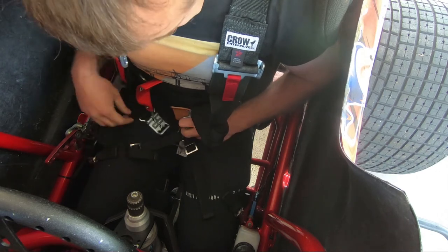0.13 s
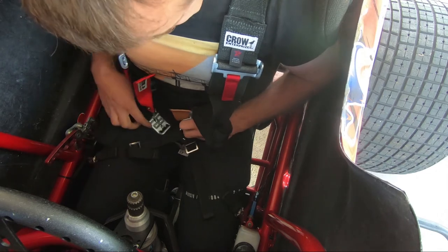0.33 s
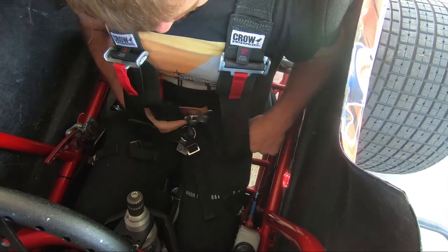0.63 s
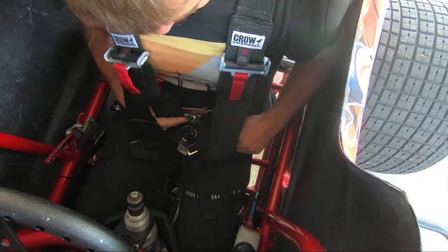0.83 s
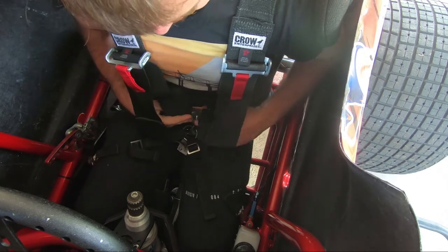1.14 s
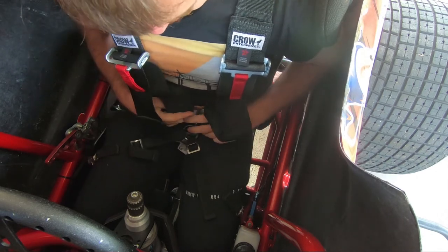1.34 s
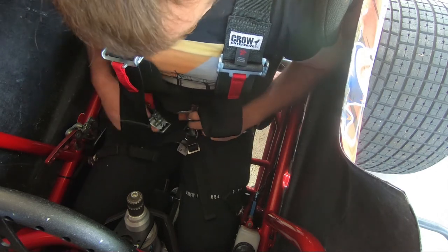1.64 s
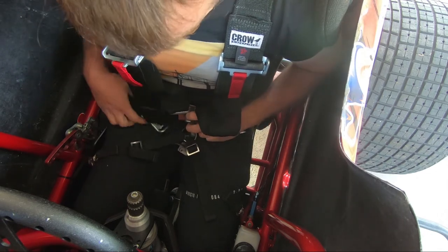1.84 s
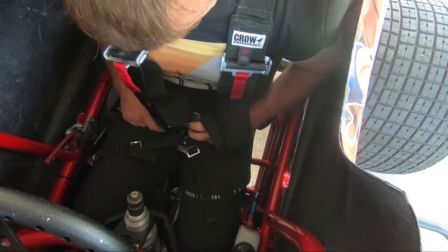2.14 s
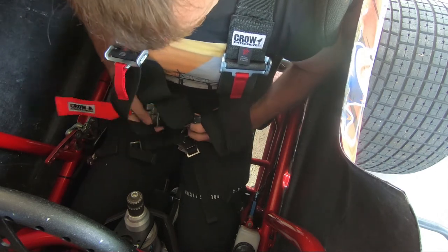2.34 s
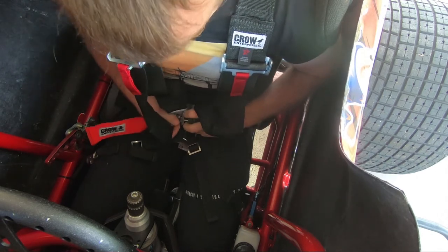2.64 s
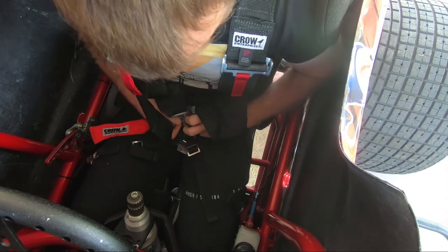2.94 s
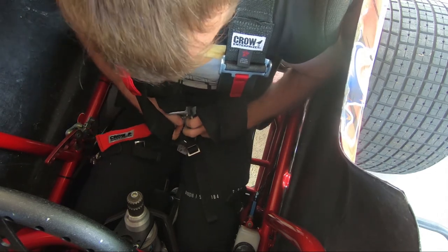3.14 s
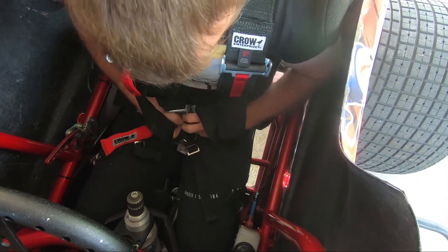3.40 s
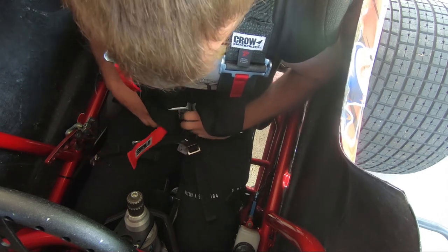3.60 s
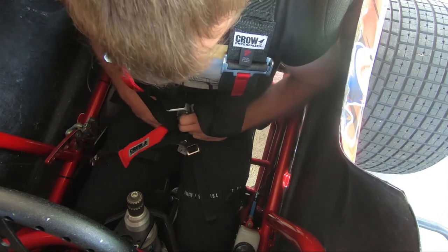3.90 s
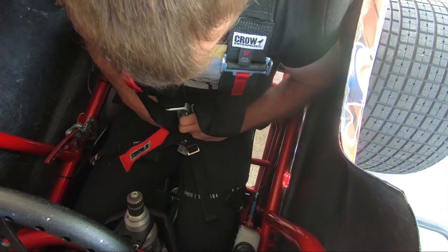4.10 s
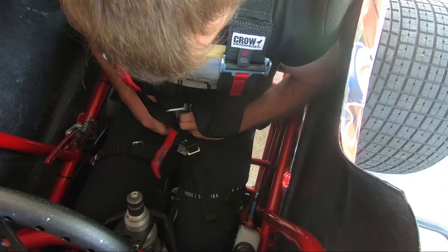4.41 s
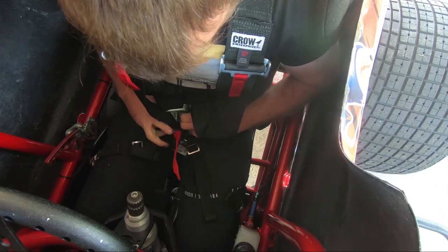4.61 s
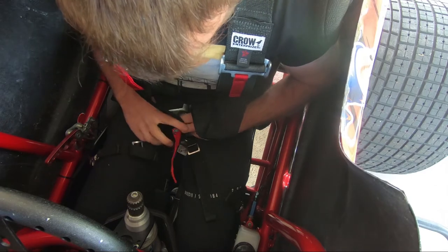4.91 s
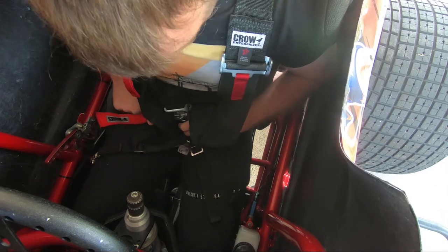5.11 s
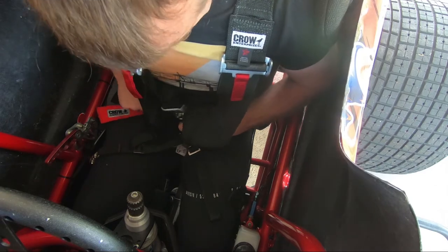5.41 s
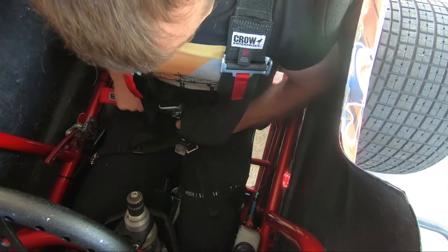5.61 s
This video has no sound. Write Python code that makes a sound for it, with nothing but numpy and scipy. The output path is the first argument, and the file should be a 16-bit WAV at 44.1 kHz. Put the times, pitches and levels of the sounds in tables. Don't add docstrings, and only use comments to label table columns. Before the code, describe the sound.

Close-miked seat belt fastening: a lever pings lightly, steel plates clink, a hook catches, and webbing rubs and drags between sparse small clicks. Muffled buckle bumps land on the padded seat. After a quieter fumbling stretch, one sharp metallic snap closes the latch with a brief hollow cockpit response. Nearly mono and dry, with soft air drift.

```python
import sys
import numpy as np
from scipy import signal
from scipy.fft import irfft
from scipy.io import wavfile

SR = 44100
rng = np.random.default_rng(int(sys.argv[2]) if len(sys.argv) > 2 else 0)


def natural_amplitude(level_db):
    exponent = np.asarray(level_db, float) / 20
    return 10 ** exponent


def to_wav(s):
    ch = np.atleast_2d(s).T
    pcm = np.round(np.clip(ch, -1, 1) * 32767)
    wavfile.write(sys.argv[1], SR, pcm.astype(np.int16))


N = 253575
SNAP_S = 5.5215


def rms_one(x):
    return x / np.sqrt(np.mean(x ** 2) + 1e-20)


def in_time(rows):
    s, *columns = np.transpose(rows)
    return [np.interp(np.arange(N) / SR, s, column) for column in columns]


def at_hz(points, hz):
    points = np.array(points)
    return np.interp(np.log(hz), np.log(points[:, 0]), points[:, 1])


def band(x, low_hz, high_hz, order=2):
    edges = [low_hz, min(high_hz, .45 * SR)]
    return signal.sosfilt(signal.butter(order, edges, "band", fs=SR, output="sos"), x)


def steep_low_pass(x, hz):
    return signal.sosfilt(signal.cheby2(16, 70, hz, fs=SR, output="sos"), x)


def drift(rate_hz):
    r = np.exp(-40 * np.pi * rate_hz / SR)
    white = rng.standard_normal(N // 20 + 4002)
    slow = signal.lfilter([1], [1, -2 * r, r * r], white)[4000:]
    return np.interp(np.arange(N) / 20, np.arange(len(slow)), rms_one(slow))


def ring(clicks, hz, t60):
    r, w = natural_amplitude(-60 / (max(t60, .004) * SR)), 2 * np.pi * hz / SR
    return signal.lfilter([0, np.sin(w)], [1, -2 * r * np.cos(w), r * r], clicks + 1e-18)


def add(out, s, x):
    i = max(round(s * SR), 0)
    out[i:i + len(x)] += x[:N - i]


def uneven(size, rough_db, most):
    white = rng.standard_normal(size)
    return rms_one(white * natural_amplitude(rough_db * np.minimum(rng.exponential(1, size), most)))


def chatter(t60, rough_db, rise=0.00013, size=5000):
    t = np.arange(size) / SR
    sizes = uneven(size, rough_db, most=4)
    return sizes * natural_amplitude(-60 * t / np.clip(t60, .004, .4)) * np.minimum(t / rise, 1)


def latch():
    # slide before the slam/s, level/dB, t60/s
    snap_settings = (0.00678, -28, 0.034)
    # f/Hz, level per Hz/dB
    snap_colour = [(120, -48), (200, -33), (409, 4), (569, -9), (763, -2), (899, -6), (1230, 4), (1480, -8),
                   (2170, -11), (2700, -0.5), (3970, 1), (8420, 0.5), (16000, -8.5)]
    # f/Hz, level/dB, t60/s
    body_modes = [(453, -27, 0.06), (808, -18, 0.046), (1230, -23, 0.041), (2320, -32, 0.1),
                  (2810, -27, .03), (4340, -18, 0.022), (6120, -16, .025), (6950, -13, .024),
                  (7960, -17, .025), (8140, -6, 0.022), (8560, -5, 0.022), (9090, -26, 0.026),
                  (13090, -20, .025)]
    # t/s, level/dB
    bounces = [
        (0, 0.5),
        (.001, -5),
        (.002, -1),
        (.004, 2),
        (.0065, -6.5),
        (0.0108, -15.5),
    ]
    slide, peak_db, t60 = snap_settings
    t = np.arange(6000) / SR - slide
    spray = uneven(6000, rough_db=2.0, most=3)
    edges, crack = np.geomspace(200, 16500, 14), 0
    for k, (lo, hi) in enumerate(zip(edges, edges[1:])):
        hz = np.sqrt(lo * hi)
        band_t60 = t60 * (3000 / hz) ** 0.088
        rattle_db = -60 * (t / band_t60) ** 0.75 * (t > 0)
        shape = natural_amplitude(np.where(t < 0, 5000 * t - 3, np.nan_to_num(rattle_db)))
        crack = crack + band(spray * shape, lo, hi) * natural_amplitude(at_hz(snap_colour, hz)) * (-1) ** k
    slam = sum(natural_amplitude(db - 5) * np.exp(-((t - s) / .00003) ** 2) for s, db in bounces)
    body = sum(natural_amplitude(level_db - 11.5) * ring(slam, hz, ring_t60) for hz, level_db, ring_t60 in body_modes)
    out = np.zeros(N)
    add(out, SNAP_S - slide, natural_amplitude(peak_db) * rms_one(crack) + band(body, 300, 16000))
    return out


def part(hits, modes, gain_db, longest):
    out = np.zeros(N)
    for s, peak_db in hits:
        for hz, level_db, t60 in modes:
            rattle = chatter(0.028, rough_db=9.0, size=8000)
            strike = .45 * rattle / np.sqrt(np.sum(rattle ** 2))
            strike[rng.integers(15, 50)] += .9
            add(out, s, natural_amplitude(peak_db + level_db + gain_db) * ring(strike, hz, min(t60, longest)))
    return out


def lever():
    # t/s, peak level/dB
    hits = [
        (0.4698, -23.5),
        (0.509, -50),
        (2.9804, -35.5),
    ]
    # f/Hz, level/dB, t60/s
    modes = [(3800, -16, .03), (3925, -2, 0.034), (4030, 1, 0.03), (4040, -32, 0.3), (5700, 8, 0.014),
             (5850, -26, .12), (7700, -1, .012), (8600, -6, .012), (9600, -18, 0.044)]
    return part(hits, modes, gain_db=-13.0, longest=.45)


def tongue():
    # t/s, peak level/dB
    hits = [
        (0.839, -21.5),
        (0.848, -36),
    ]
    # f/Hz, level/dB, t60/s
    modes = [(3010, -7, .03), (3990, -12, .03), (5010, -3, 0.018), (6300, -10, .03), (7260, -1.5, 0.03),
             (8300, -10, 0.023), (9140, -4, 0.03), (9700, -8, .027), (10700, -11, 0.034),
             (14220, -14, 0.049), (14860, -13, 0.02)]
    return part(hits, modes, gain_db=-10.5, longest=0.043)


def link():
    # t/s, peak level/dB
    hits = [
        (1.7679, -39),
        (1.7904, -50),
    ]
    # f/Hz, level/dB, t60/s
    modes = [(1320, -10, 0.016), (3680, -4, 0.024), (5730, 4, 0.041), (6250, -4, 0.06), (6810, -7, 0.07),
             (7700, -5, .04), (8000, 2, 0.02), (9020, -8, 0.04), (11400, -7, 0.051)]
    return part(hits, modes, gain_db=-7.0, longest=0.063)


def hook():
    # t/s, peak level/dB
    hits = [
        (2.2335, -36),
        (2.2362, -29.5),
        (2.2574, -46),
    ]
    # f/Hz, level/dB, t60/s
    modes = [(2380, -6, 0.024), (2620, -8, .02), (3100, 2, 0.02), (3450, -5, 0.02), (6280, -20, 0.03),
             (7600, -24, .02), (11400, -30, 0.045)]
    return part(hits, modes, gain_db=-3.5, longest=0.049)


def tongue_tip():
    # t/s, peak level/dB
    hits = [
        (0.8646, -24),
    ]
    # f/Hz, level/dB, t60/s
    modes = [(1990, -8, .023), (6620, -9, .021), (7200, -10, .035), (8250, -10, .04), (9100, -3, 0.035),
             (10800, -16, .03), (11940, -10, .03), (12470, -9, .03), (14340, -14, .04), (15200, 1.5, .035)]
    return part(hits, modes, gain_db=-10.5, longest=.045)


def adjuster_bar():
    # t/s, peak level/dB
    hits = [
        (4.1445, -37),
    ]
    # f/Hz, level/dB, t60/s
    modes = [(2374, 0, .035), (2700, -5, .02), (3900, -2, .04), (5970, -9, .04), (6870, -13, .04),
             (7770, -6, .03), (11950, -14, .03)]
    return part(hits, modes, gain_db=-6.5, longest=.042)


def catch():
    # t/s, peak level/dB
    hits = [
        (5.2312, -32),
    ]
    # f/Hz, level/dB, t60/s
    modes = [(815, -30, 0.13), (1120, -0.5, 0.078), (1715, -2.5, 0.044), (1960, -8, 0.073),
             (2130, -6, 0.068)]
    return part(hits, modes, gain_db=-5, longest=.03)


def touches():
    # t/s, peak level/dB, low ring f/Hz, high ring f/Hz, edge over 4.5 kHz/dB
    clinks = [(0.0084, -38.5, 1140, 8660, 9.5), (0.018, -36, 2160, 6340, -8), (0.4685, -30, 3900, 5500, -5),
              (0.838, -31.5, 2300, 9300, 8.5), (0.8494, -39.5, 3200, 7300, 11),
              (0.9423, -36, 4750, 4900, -5), (0.9445, -40, 4800, 7200, -4), (1.3106, -41, 5040, 7200, 0),
              (1.763, -42, 1350, 5500, 2), (1.768, -47, 1360, 5660, -16), (1.9393, -46, 1310, 5350, -8),
              (1.957, -38, 3800, 6300, 3), (2.0471, -42, 1600, 4940, -14), (2.0644, -36.5, 1750, 6300, -8),
              (2.0895, -40, 3500, 6400, -2), (2.1963, -42, 1140, 8300, -4), (2.233, -38, 3250, 6280, -22),
              (2.255, -44, 2300, 6170, 5), (2.9788, -42, 4000, 4770, 1.5), (4.1431, -35, 3880, 6700, -3),
              (4.369, -47, 4300, 4800, -6), (4.5126, -36, 2500, 7100, 1), (4.8763, -45, 4600, 5200, 8),
              (5.2306, -36.5, 1720, 6700, 7), (5.347, -47, 2460, 9000, -6)]
    # t/s, peak level/dB, ring f/Hz, edge/dB
    clacks = [(0.0656, -41.5, 1960, -1), (0.8651, -38.5, 1960, 8), (0.891, -46, 1900, -15),
              (1.4296, -45, 1610, -32), (1.7906, -40, 1380, -3), (3.488, -47, 1500, -8),
              (2.7062, -34, 4500, 9), (2.7114, -29.5, 1670, -2), (3.0341, -33.5, 1250, 12.5),
              (3.0402, -37, 1300, 0), (3.0854, -51, 2220, 5), (3.546, -37, 1670, -36),
              (3.579, -34.5, 2780, 5), (5.6205, -41, 1220, 12)]
    # t/s, peak level/dB, ring f/Hz, edge/dB
    knocks = [(0.2074, -52, 1680, -3), (2.5661, -39.5, 1150, -7), (2.7958, -48.5, 1110, 0),
              (3.022, -44, 3100, 5), (3.2115, -52, 1580, -17), (3.4412, -46, 1890, -23),
              (4.2491, -44.5, 1100, -31), (4.4301, -44, 1120, -22), (4.45, -48.5, 1150, -26),
              (4.499, -49, 1290, -14), (4.539, -47, 1300, -14), (4.5446, -40, 2360, 2),
              (4.6184, -54.5, 1190, -31), (5.0529, -47.5, 1120, -11), (5.1008, -36, 1090, -2),
              (3.654, -52, 1500, -8), (5.3767, -47, 1810, -17), (5.4805, -42.5, 1800, -11)]
    rows = [(s, db, low, high, -17.5, edge) for s, db, low, high, edge in clinks]
    for table, thud_db in (clacks, -8), (knocks, -2):
        for s, db, low, edge in table:
            high = 6440 * 2 ** (edge / 47)
            rows.append((s, db, low, high, thud_db, edge))
    return rows


def contacts():
    out = np.zeros(N)
    for s, peak_db, low_hz, high_hz, thud_db, edge_db in touches():
        thud = band(chatter(0.06, rough_db=2.0), 480, 1700) * natural_amplitude(thud_db + 15)
        spray = chatter(0.037, rough_db=4.0, rise=.0014)
        crack = band(spray, 1090, 5000) * natural_amplitude(0.5)
        crack += band(spray, 4130, 6200) * natural_amplitude(edge_db - 13.5)
        crack += band(spray, 13000, 15000) * natural_amplitude(0.72 * edge_db - 14)
        crack += band(spray, 11600, 11700) * natural_amplitude(edge_db - 19.0)
        tone = ring(spray, low_hz, min(.012, 24 / low_hz)) * natural_amplitude(-18.5)
        tone += ring(spray, high_hz, 0.0024) * natural_amplitude(edge_db - 21)
        for hz in 1500 * 2 ** rng.uniform(0, 3, 6):
            tone += ring(spray, hz, .004) * natural_amplitude(edge_db * (hz > 4500) - 26)
        add(out, s, natural_amplitude(peak_db - 4.0) * (thud + crack + tone))
    return out


def ticks():
    # t/s, peak level/dB, centre f/Hz
    snaps = [(2.368, -35, 6500), (2.377, -36, 6500), (2.391, -47, 8880), (2.401, -49, 8000),
             (2.426, -50, 12500), (2.4304, -50, 5350), (2.443, -58, 11000), (2.457, -47, 9500),
             (2.484, -52, 13500), (2.490, -53, 12500), (2.498, -44, 11000), (2.517, -53, 9000),
             (2.549, -49, 12000), (2.611, -55, 9000), (2.622, -42.5, 8400), (2.6524, -43, 6000),
             (2.673, -44, 6000), (2.678, -41, 5670), (2.8387, -47.5, 8700), (2.998, -47, 5830),
             (3.008, -41, 9000), (3.072, -44, 6340), (3.097, -57, 8000), (3.115, -62, 9000),
             (3.1447, -40.5, 8000), (3.155, -47, 7800), (3.167, -59, 11000), (3.1784, -55, 8500),
             (3.2146, -53, 5930), (3.478, -54, 9160), (3.4895, -37, 7500), (3.509, -51, 5540),
             (3.608, -52, 6530), (4.271, -51, 9000), (4.3695, -50, 9400), (4.4305, -49, 6000),
             (4.539, -45, 7300), (4.9864, -57, 5910)]
    out = np.zeros(N)
    for s, peak_db, hz in snaps:
        snap = chatter(0.012, rough_db=3.0, rise=0.0003, size=2000)
        snap[12] += 3
        broad = band(snap, 3500, 16000) * natural_amplitude(-6.0) + band(snap, 0.65 * hz, 1.5 * hz) * natural_amplitude(2.5)
        centre = band(snap, 0.93 * hz, 1.1 * hz) * natural_amplitude(5.0)
        add(out, s, natural_amplitude(peak_db - 7.0) * (broad + centre))
    return out


def thumps():
    # t/s, peak level/dB, pitch f/Hz, t60/s
    bumps = [(0.131, -36, 456, 0.24), (0.208, -42, 480, 0.12), (0.226, -40, 173, 0.5),
             (0.789, -50, 404, 0.5), (2.258, -50, 185, 0.5), (2.569, -36.5, 450, 0.31),
             (2.706, -37, 400, 0.36), (2.712, -34, 850, .14), (2.742, -52, 157, 0.25),
             (3.544, -54, 567, 0.28), (4.249, -36, 600, 0.25), (5.099, -39.5, 506, 0.11),
             (5.138, -39, 380, 0.26)]
    out = np.zeros(N)
    for s, peak_db, hz, t60 in bumps:
        push = chatter(t60, rough_db=10.0, rise=0.0018, size=12000)
        hump = natural_amplitude(-2.0) * band(push, 0.6 * hz, 1.35 * hz, order=3)
        add(out, s, natural_amplitude(peak_db + 4.5) * (band(push, 96, 418) + hump))
    return out


def webbing(patchy_db, grain_db):
    # t/s, rustle level/dB
    hands = [(0.0, -51.5), (0.1, -57), (0.4, -61), (0.72, -66.5), (1.1, -60.5), (1.46, -60), (1.98, -61.5),
             (2.45, -63.5), (2.7, -56), (2.85, -64.5), (3.33, -67), (3.62, -59.5), (4.21, -66), (4.93, -66),
             (5.12, -58.5), (5.3, -63), (5.37, -59), (5.75, -57)]
    # f/Hz, level per Hz/dB
    cloth_colour = [(53, -30), (90, -0.5), (188, -2), (457, -3), (786, -6), (3220, -14.5), (4750, -15),
                    (5180, -11), (8350, -23), (15000, -23.5), (16000, -30)]
    busy_db = in_time(hands)[0] + 62
    rub_db, rustle_db = -63.5 + 0.49 * busy_db, -61.5 + 0.94 * busy_db
    white = rng.standard_normal((2, N)) * natural_amplitude(grain_db * rng.exponential(1, N))
    together, edges = drift(14.0), np.append(88 * 2 ** np.arange(0, 7.1, .5), 19000)
    rub, rustle = np.zeros(N), np.zeros(N)
    for k, (lo, hi) in enumerate(zip(edges, edges[1:])):
        flicker_db = patchy_db * (1.3 * together + 0.18 * drift(8.4))
        colour_db = at_hz(cloth_colour, np.sqrt(lo * hi))
        layer = rustle if lo > 600 else rub
        layer += natural_amplitude(colour_db + flicker_db) * band(white[k % 2], lo, hi)
    return natural_amplitude(rub_db - 3.0) * rms_one(rub) + natural_amplitude(rustle_db - 3.0) * rms_one(rustle)


def jerks():
    # t/s, level/dB, centre f/Hz, length/s
    drags = [(.02, -71, 4000, 0.15), (5.7, -66, 8000, 0.14), (0.212, -60.5, 2130, 0.16),
             (0.692, -69, 2080, 0.14), (1.773, -49, 2500, 0.021), (1.833, -59.5, 2900, 0.088),
             (1.596, -59, 1570, 0.11), (1.28, -62.5, 2840, 0.14), (1.949, -57.5, 3550, 0.025),
             (2.082, -57.5, 3430, 0.1), (2.106, -60, 6040, 0.074), (2.376, -59.5, 7000, 0.066),
             (2.678, -63, 6050, 0.072), (3.496, -57, 6100, 0.018), (3.57, -63, 3070, 0.056),
             (3.819, -61, 4000, 0.19), (5.58, -60, 3000, 0.1), (5.171, -65, 3180, 0.047),
             (5.38, -63, 2920, 0.066), (5.494, -53, 1540, 0.049), (1.285, -68, 8000, 0.072),
             (3.582, -53, 8000, 0.027), (3.847, -68.5, 9100, 0.15), (4.876, -56, 4370, .015),
             (5.085, -66, 9000, 0.026), (5.161, -64, 8000, 0.034), (5.372, -66, 8000, 0.032),
             (5.464, -66, 7940, 0.11), (0.825, -60, 1490, 0.047), (4.108, -69, 4000, 0.11)]
    out, t = np.zeros(N), np.arange(-6000, 6000) / SR
    for s, level_db, hz, length in drags:
        grains = uneven(12000, rough_db=0.83, most=4)
        clumps = natural_amplitude(1.5 * np.repeat(rng.standard_normal(60), 200))
        drag = rms_one(band(grains * clumps, 0.34 * hz, 1.5 * hz)) * np.exp(-(2 * t / length) ** 2)
        add(out, s + t[0], natural_amplitude(level_db) * drag)
    return out


def thin_tones():
    # t/s, level/dB, f/Hz, length/s
    runs = [
        (.55, -74, 4050, .08),
        (0.692, -69, 2320, 0.067),
        (2.68, -70, 2600, .05),
        (2.77, -68, 2630, 0.14),
        (2.9, -74, 2530, 0.06),
        (3.748, -69, 2500, 0.15),
    ]
    out, t = np.zeros(N), np.arange(-8000, 8000) / SR
    for s, level_db, hz, length in runs:
        line = rms_one(band(rng.standard_normal(len(t)), hz - 45, hz + 45))
        add(out, s + t[0], natural_amplitude(level_db) * line * np.exp(-(2 * t / length) ** 2))
    return out


def bay(x):
    # f/Hz, width/Hz, level/dB
    hollows = [(2450, 600, -4), (8700, 1600, -4), (1000, 400, -6)]
    return x + sum(natural_amplitude(db) * band(x, hz - width / 2, hz + width / 2, order=1) for hz, width, db in hollows)


def cockpit(x):
    # low f/Hz, high f/Hz, level under the hit/dB, t60/s
    reflections = [(151, 610, -16.5, 0.54), (696, 2450, -22, 0.19), (2500, 8800, -28.5, 0.46),
                   (7000, 11000, -32.5, 0.53), (12000, 14000, -30, .3)]
    t = np.arange(SR // 2) / SR
    tail = 0
    for low_hz, high_hz, level_db, t60 in reflections:
        dying = rng.standard_normal(len(t)) * natural_amplitude(-60 * t / t60) * np.minimum(t / 0.014, 1)
        tail = tail + natural_amplitude(level_db) * band(dying, low_hz, high_hz) / np.sqrt(t60 * SR / 140)
    return signal.fftconvolve(x, tail)[:N]


def air():
    # t/s, rumble level/dB
    gusts = [(0.0, -51), (0.35, -72.5), (1.2, -69), (1.42, -67.5), (2.11, -74.5), (2.42, -59.5), (2.5, -68),
             (2.75, -64), (3.19, -70.5), (5.03, -70), (5.12, -55.5), (5.4, -64), (5.7, -51.5), (5.75, -65)]
    rumble_db, = in_time(gusts)
    white = rng.standard_normal((2, N + SR))
    slow = rms_one(band(white[0], 4.7, 10.75)[SR:])
    rumble = rms_one(band(white[1], 28, 62)[SR:])
    return natural_amplitude(-53.5) * slow + natural_amplitude(rumble_db - 1.0) * rumble


def scene():
    small, snap, thin = contacts(), latch(), ticks()
    rings = lever() + tongue() + link() + hook() + tongue_tip() + adjuster_bar() + catch()
    blow = natural_amplitude(11.5) * (np.arange(N) == round(SNAP_S * SR))
    slam = band(blow, 370, 14000, order=1)
    quiet = small + rings + thin + cockpit(small + rings * natural_amplitude(-14) + slam)
    quiet += thumps() + bay(webbing(patchy_db=0.93, grain_db=1.87) + jerks()) + thin_tones()
    mono = steep_low_pass(quiet, hz=16120) + snap + air()
    return np.array([mono, mono])


def top_cut(x):
    return signal.sosfilt(signal.butter(12, 16880, fs=SR, output="sos"), x)


def record(dry):
    rounded = 1.1 * np.tanh(dry / 1.1)
    smear = irfft(np.exp(2j * np.pi * rng.random(129)))
    trace = signal.fftconvolve(rounded[0], smear)[128:128 + N]
    trace = trace * natural_amplitude(-40) + natural_amplitude(-38) * band(trace, 3500, 11000, order=1)
    trace += natural_amplitude(-74) * band(rng.standard_normal(N), 20, 200, order=1)
    trace += natural_amplitude(-80.5) * band(rng.standard_normal(N), 240, 17000, order=1)
    mix = steep_low_pass(rounded + trace * [[1], [-1]], hz=16950)
    return top_cut(mix)


dry = scene()
out = record(dry)
to_wav(out)
```